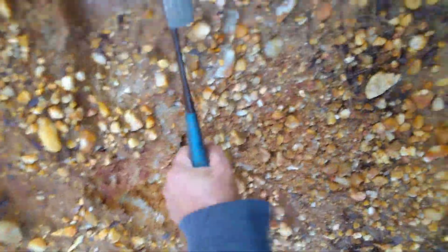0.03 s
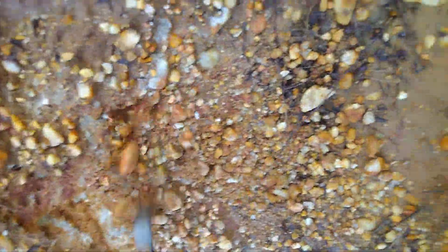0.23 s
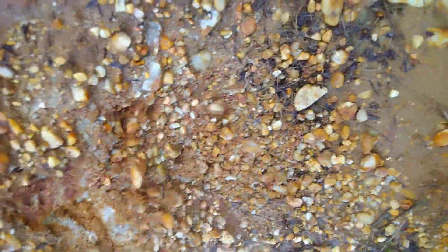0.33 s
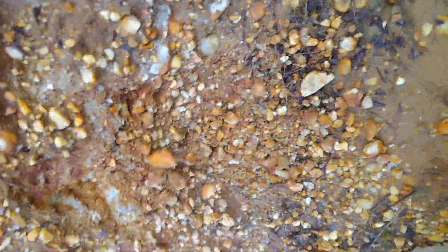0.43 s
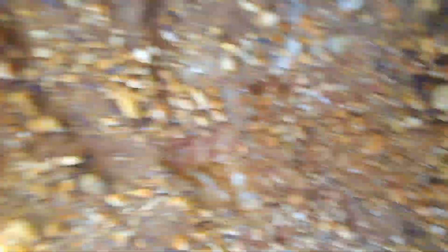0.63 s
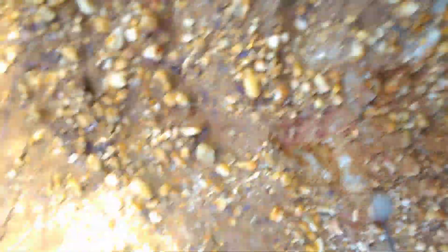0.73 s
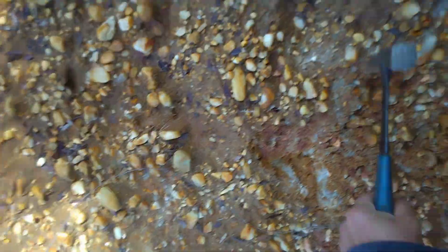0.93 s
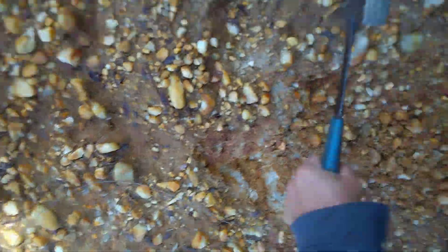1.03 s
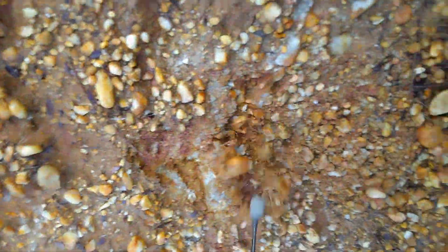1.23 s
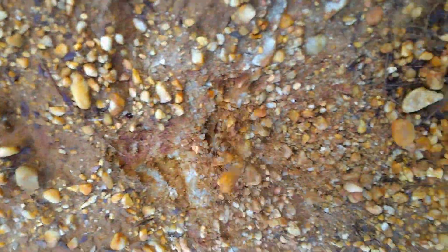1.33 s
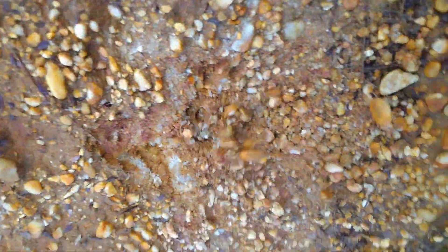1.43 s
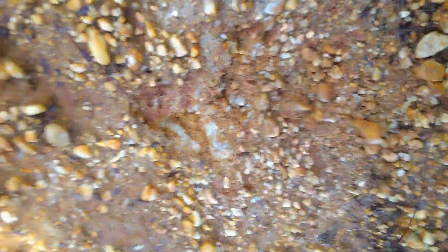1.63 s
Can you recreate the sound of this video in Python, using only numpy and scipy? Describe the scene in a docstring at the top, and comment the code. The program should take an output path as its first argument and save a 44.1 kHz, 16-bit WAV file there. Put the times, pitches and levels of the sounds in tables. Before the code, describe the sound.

A small pick strikes pebbly clay, crunching sharply with a faint dull thud; pebbles click down and sand trickles, then a second bite about a second later. Outdoors, very close stereo microphone, almost no background.

```python
"""Faint open-air noise lies under everything. A rock pick bites into pebbly clay, close below a small
two-port microphone: bursts of grains make gritty crunches with a dull thud, and stones ring when knocked.
Then loosened pebbles click down the face as short rings, and a flickering trickle of sand follows.
About a second after the first bite comes a second one, with more crunches, clicks and sand."""
import sys
import numpy as np
from scipy import signal
from scipy.fft import rfft, irfft
from scipy.io import wavfile
from scipy.ndimage import uniform_filter1d, map_coordinates

SR = 44100
rng = np.random.default_rng(int(sys.argv[2]) if len(sys.argv) > 2 else 0)


def store_wav(level_fs):
    """Save 16-bit WAV to argv[1]."""
    pcm = np.round(np.clip(np.atleast_2d(level_fs), -1, 1) * 32767)
    wavfile.write(sys.argv[1], SR, pcm.T.astype(np.int16))


N = 74970

# Open air, its colour: pitch_hz, relative level_db (per Hz)
AIR_COLOUR = [(25, -8), (70, 10.5), (200, -9), (500, -7.5), (1000, -19), (3000, -22), (9000, -40.5),
              (13000, -13.5), (16000, -53)]
# Open air, its level over time: time_s, level_db (of the part shared by left and right)
AIR_LEVEL = [(0.15, -71), (0.8, -65), (1.0, -71.5), (1.45, -66)]
AIR_SWELL_DB, AIR_SWELLS_PER_S = 1.5, 15

# The four layers of the digging, as resonances: pitch_hz, width_hz, level_db
EARTH = [(180, 180, -6.5), (420, 540, -10.5)]  # packed clay
STONE = [(634, 450, -1), (963, 454, -0.5), (1800, 1930, 0)]  # stones knocking
SCRAPE = [(2740, 2200, -8), (4970, 6140, -7)]  # scraping edges
GRIT = [(7890, 3630, 1), (9950, 2900, 3), (14700, 4000, -9.5)]  # fine grit

# Trickling sand: time_s, treble level_db, middle level_db (both before each band's own level)
SAND_LEVELS = [(0.0, -70.5, -62.5), (0.226, -76, -73.5), (0.276, -40.5, -40), (0.354, -46.5, -53.5),
               (0.396, -62, -63), (0.458, -56.5, -53), (0.53, -49.5, -60), (0.59, -45.5, -63),
               (0.8, -57, -70.5), (0.89, -53, -67), (1.04, -71.5, -81.5), (1.188, -69.5, -57.5),
               (1.279, -74, -40), (1.396, -77, -52.5), (1.438, -50, -56), (1.7, -44.5, -45.5)]
SAND_GRAIN_DB, SAND_LIKENESS, SAND_GAIN = 4, 0.046, 1.44
SAND_FLICKER_DB, BAND_FLICKER_DB = 3.5, 4.5  # flicker of all the sand, of each band alone
TICKS_PER_S, TICK_DB, TICK_T60_S = 80, 3.5, .008  # stray grains over the trickle, in each band

# Pebbles clicking: start_s, level_db (before the trim below), pitch_hz, dull part_db (before doubling),
# left-right_db, left port late_ms, ring width_hz
CLICKS = [(0.1675, -15.5, 9800, -45, 15, 0.35, 353), (0.3308, 13.5, 8400, -52, -11, 0.1, 1490),
          (0.3594, -8, 7000, -11, 1, 0.11, 1500), (0.48, -13, 3080, -15.5, 4, 0.048, 1500),
          (0.4846, -6.5, 8600, -21, -10, -0.56, 1500), (0.49, -12, 8360, -15, 7, 0.22, 1500),
          (0.52, -5.5, 9930, -17, 18, 0.45, 1476), (0.5594, -9.5, 10000, -21, 3, -0.26, 1500),
          (0.6419, -9, 7700, -36, 2, -0.1, 600), (0.659, 0, 8660, -33, 2, -0.26, 1500),
          (0.6792, -13.5, 2500, -5, 6, -0.13, 1520), (0.6931, -8, 8800, -16, 21, 0.59, 600),
          (0.7076, -20, 10379, -29, -1, 0.2, 1500), (0.8477, 1, 8970, -34, 3, -0.18, 1480),
          (0.8699, -12.5, 9950, -25, -21, 0.204, 350), (0.9355, -17, 10700, -39, 12, 0.204, 1500),
          (0.9637, -13.5, 11170, -43, 11, 0.272, 350), (1.0884, -28.5, 12273, -17, 16, -0.085, 1460),
          (1.3345, -5.5, 9700, -13, 1, 0.0024, 1500), (1.3414, -16, 2550, -14, -11, 0.00016, 1500),
          (1.3689, 4.5, 10100, -8, -6, -0.045, 1500), (1.4075, -13, 11100, -15, 13, 0.3, 1510),
          (1.4616, -6, 10000, -35, -28, 0.13, 1500), (1.499, -13, 9400, -20, 8, -0.24, 1500),
          (1.5707, -1.5, 11000, -26, -1, -0.13, 1500), (1.652, -3.5, 9400, -19, -10, 0.065, 1500),
          (1.6781, -6, 8240, -6.5, -6, 0.062, 1500)]
CLICK_TRIM_DB = -7
# Dull part of a click: pitch_hz, width_hz, level_db
DULL_TAP = [(2370, 5900, 3.6), (4770, 6400, 9)]

# Larger stones knocked by the pick: start_s, peak level_db (before left-right), pitch_hz, ring width_hz
KNOCKS = [(0.2311, -31.5, 846, 350), (0.3302, -23, 890, 442), (0.329, -27, 205, 110),
          (0.332, -34, 453, 151), (0.3837, -31.5, 910, 393), (0.3848, -24, 294, 197),
          (1.2304, -17.5, 850, 447), (1.2363, -19.5, 840, 450), (1.27, -31, 256, 120),
          (1.2959, -30, 1970, 220), (1.3078, -19, 1706, 443), (1.309, -28, 259, 120),
          (1.3403, -18, 893, 500), (1.3688, -20, 1180, 610), (1.633, -33.5, 973, 300)]
KNOCK_LEFT_RIGHT_DB = 3

# Crunches of pick, clods and loose grit: start_s, level_db (before a 9 dB cut),
# thud_db, knock_db, scrape_db (relative, before the trims below),
# thud pitch_hz, knock pitch_hz, scrape pitch_hz, grit pitch_hz, left-right_db,
# rise_s, hold_s, fade_s (a 60 dB fade, before the layer's own speed)
CRUNCHES = [(0.166, -23.5, -64, -27.5, -30, 522, 570, 3470, 9670, 1, 0.00041, 0.00057, 0.021),
            (0.23, -1.5, -35.5, -27, -21.5, 366, 1386, 5560, 7590, 3, 0.0042, 0.0042, 0.013),
            (0.234, 4.5, -38, -33, -21.5, 236, 800, 5180, 8630, -2, 0.0026, 0.00067, 0.039),
            (0.266, -28, -29, -19, -7, 248, 1080, 6000, 9450, -5, 0.0012, 0.0018, 0.058),
            (0.328, -3, -33, -24, -14, 197, 830, 4730, 8360, 1.5, 0.0014, 0.0022, 0.017),
            (0.336, -19.5, -24, -21, -22, 443, 1500, 5400, 9100, -14, 0.0012, 0.0013, 0.021),
            (0.381, -1.5, -36.5, -17.5, -15, 237, 2255, 4650, 9740, 1.5, 0.00072, 0.00065, 0.031),
            (0.385, -5.5, -29, -51, -16.5, 320, 2050, 5790, 8520, -4, 0.00043, 0.0019, 0.03),
            (0.433, -28.5, -28, -12, -12, 236, 890, 5840, 8200, 3, 0.003, 0.0029, 0.017),
            (0.4795, -27, -23, -20, -6, 262, 2240, 3090, 8760, 1, 0.0018, 0.0027, 0.028),
            (0.486, -22, -34, -17, -26, 264, 2130, 4640, 8300, 3.5, 0.0011, 0.0025, 0.01),
            (0.518, -16.5, -39, -31.5, -15, 206, 2210, 6020, 9580, -1, 0.0047, 0.0019, 0.013),
            (0.5585, -26, -58, -50, -18, 183, 2130, 5600, 9150, -3.5, 0.00082, 0.0019, 0.036),
            (0.595, -24, -37.5, -27, -14.5, 272, 1700, 6000, 8300, 7, 0.0026, 0.0043, 0.16),
            (0.6, -15.5, -47, -21, -13, 194, 2270, 5890, 6820, 2, 0.0015, 0.0029, 0.021),
            (0.604, -22, -54, -23, -15.5, 266, 1020, 4640, 9150, -13.5, 0.0011, 0.0015, 0.04),
            (0.656, -21, -52, -29, -18, 228, 1830, 6100, 7460, 0, 0.0015, 0.0012, 0.14),
            (0.676, -23.5, -32, -14.5, -16, 214, 1480, 2264, 8500, 3.5, 0.00053, 0.0014, 0.04),
            (0.686, -25.5, -30.5, -26, -15.5, 257, 2470, 2534, 8860, -6, 0.0011, 0.0016, 0.088),
            (0.716, -31.5, -33.5, -22, -18, 250, 1510, 3140, 11360, 2.5, 0.0017, 0.0069, 0.13),
            (0.799, -36.5, -24, -36, -21, 184, 713, 5710, 10800, 10, 0.0012, 0.0018, 0.015),
            (0.816, -35.5, -33, -21, -10.5, 268, 1020, 6100, 7640, 7.5, 0.0022, 0.001, 0.1),
            (0.844, -10, -45.5, -33, -22.5, 220, 1490, 3030, 9930, 3.5, 0.0017, 0.0019, 0.025),
            (0.865, -31.5, -41, -31, -17, 237, 2220, 5700, 9900, 3, 0.0018, 0.0018, 0.092),
            (0.932, -26.5, -71, -62, -27, 158, 694, 6200, 10450, 2, 0.0019, 0.0018, 0.067),
            (0.984, -42, -28, -10, -23, 500, 1590, 2840, 11000, 10, 0.0015, 0.0022, 0.041),
            (1.026, -34, -32, -38, -24.5, 270, 1770, 5750, 6080, 2.5, 0.0029, 0.0021, 0.025),
            (1.086, -45, -52, -17, -10, 277, 980, 5900, 7380, -3, 0.0013, 0.00088, 0.035),
            (1.099, -40, -30, -14.5, -9, 192, 1700, 4400, 7690, 9.5, 0.0013, 0.0054, 0.015),
            (1.23, 3, -37.5, -23, -20.5, 514, 2300, 4900, 10170, -3, 0.0015, 0.0027, 0.014),
            (1.234, -12, -28, -31, -27, 155, 1375, 4110, 7920, 3, 0.0015, 0.0064, 0.041),
            (1.263, -3, -32, -19.5, -16, 250, 1780, 5480, 8960, 1.5, 0.0007, 0.00099, 0.059),
            (1.293, -21, -22, -10, -10.5, 207, 2130, 2880, 8800, 8, 0.001, 0.0047, 0.014),
            (1.306, -7, -24.5, -21, -9.5, 260, 1600, 4753, 9200, 0, 0.0038, 0.0032, 0.029),
            (1.331, -18, -30, -30, -17, 248, 2280, 2480, 9140, -11, 0.00074, 0.0039, 0.17),
            (1.34, -5.5, -20.5, -18.5, -11.5, 214, 870, 2694, 8420, 1.5, 0.0024, 0.00062, 0.028),
            (1.346, -14.5, -29, -27, -20.5, 310, 2260, 3330, 9240, -2, 0.0013, 0.0034, 0.064),
            (1.367, -2.5, -25.5, -27, -24, 243, 1165, 3206, 10750, 1, 0.0024, 0.0021, 0.038),
            (1.404, -27.5, -29, -42, -23, 420, 1300, 5390, 10800, -11, 0.00098, 0.0021, 0.066),
            (1.418, -25.5, -44, -21.5, -22, 335, 2330, 3740, 9500, 0.5, 0.0022, 0.0022, 0.065),
            (1.458, -20.5, -34.5, -48, -26, 193, 2100, 5500, 9100, -1, 0.00053, 0.001, 0.012),
            (1.481, -27.5, -21.5, -11.5, -26, 276, 2380, 2250, 8500, 6.5, 0.00066, 0.0019, 0.03),
            (1.4976, -14, -43, -52, -24.5, 290, 2350, 6100, 9200, -6, 0.001, 0.001, 0.021),
            (1.521, -40.5, -20, -6, -12, 284, 2260, 4060, 7350, 4, 0.0015, 0.0036, 0.057),
            (1.567, -20, -38.5, -68, -25.5, 430, 2300, 5280, 9340, -2.5, 0.0013, 0.0037, 0.079),
            (1.59, -25, -35.5, -36, -21, 276, 2070, 5650, 8940, -2, 0.0015, 0.0022, 0.12),
            (1.609, -23.5, -34, -16.5, -13.5, 236, 2080, 4260, 8260, 0.5, 0.003, 0.0013, 0.095),
            (1.632, -26, -17, -5.5, -17, 270, 977, 2450, 9600, 4.5, 0.00073, 0.0053, 0.015),
            (1.6495, -16, -42, -51, -18.5, 401, 2170, 6090, 8760, -2, 0.00072, 0.0011, 0.023),
            (1.676, -28, -19.5, -6.5, -6, 270, 2050, 2880, 8350, 3, 0.0055, 0.0012, 0.027),
            (1.68, -26.5, -35, -16, -11, 513, 1500, 3030, 8900, 1, 0.0011, 0.001, 0.025)]
THUD_TRIM_DB, KNOCK_TRIM_DB, SCRAPE_TRIM_DB, GRIT_LEVEL_DB = 6.5, 2, 5.5, -5
# Each crunch's own pitch, one row a layer (thud, knock, scrape, grit): width_hz, level_db
OWN_PITCH = [(130, 7.5), (260, 10.5), (500, 2), (900, 5)]
# One value a layer, in the same order:
LAYER_LIKENESS = (0.99, 0.32, 0.33, 0.059)  # left-right likeness, 0 to 1
PUSH_DB = (1, -5, -18, -31)  # level_db of the first contact, a single push
FADE_SPEED = (0.76, 0.85, 1.093, 1.076)  # power on the burst's shape: above 1 dies away faster
GRAIN_DB, TAIL_DB, TAIL_T60_S = 4, -19.5, 0.15  # the tail's fade is also before the layer's own speed
LUMPS_PER_S, LUMP_DB = 1100, 3.5  # a crunch breaks up into uneven cracks
# Small stones ring briefly at chance pitches; the width is for a 2000 Hz layer pitch
RINGS, RING_WIDTH_HZ, RING_DB, RING_ABOVE_HZ = 5, 100, 1, 1200
# The digging moves from the right to the middle: time_s, left port delay_s
LEFT_LATE = [(.7, .00011), (1.2, 0)]

FULL_SCALE, ROLL_HZ, TOP_HZ = .72, 14800, 16650  # microphone: amplitude limit, roll-off, steep cut


def undb(db):
    """Turn decibels into an amplitude factor."""
    return 10 ** (np.asarray(db) / 20)


def unit(x):
    """Scale to an average (RMS) strength of 1."""
    return x / np.sqrt(np.mean(x ** 2))


def left_right(value):
    """Give the left port a value and the right port its opposite."""
    return np.array([[value], [-value]])


def ring(x, hz, width_hz):
    """Resonance with gain 1 at its centre; a narrower one rings longer."""
    return signal.lfilter(*signal.iirpeak(min(hz, SR * .45), hz / width_hz, SR), x)


def body(x, table):
    """Sum of resonances with alternating signs, each applied twice for steep skirts."""
    total = 0
    for k, (hz, width_hz, db) in enumerate(table):
        twice = ring(ring(x, hz, width_hz), hz, width_hz)
        total = total + (-1) ** k * undb(db) * twice
    return total


def grains(n, spread_db, likeness):
    """Dense clicks of uneven size, partly shared by both ports."""
    size = undb(spread_db * np.minimum(rng.exponential(size=n), 4))
    shared = np.clip(likeness, 0, 1)
    both, own = rng.standard_normal(n), rng.standard_normal((2, n))
    return unit(size * (np.sqrt(shared) * both + np.sqrt(1 - shared) * own))


def walk(rate, n=N):
    """Random levels, about `rate` a second, gliding from one to the next."""
    step = int(SR / rate)
    levels = np.repeat(rng.standard_normal(n // step + 1), step)
    return uniform_filter1d(levels, step)[:n]


def air():
    """Faint open-air noise, swelling a little; the bass is more alike left and right."""
    hz, table = np.arange(N // 2 + 1) * SR / N + 1, np.array(AIR_COLOUR)
    colour = undb(np.interp(np.log(hz), np.log(table[:, 0]), table[:, 1]))
    mid = irfft(rfft(rng.standard_normal(N)) * colour, N)
    side_colour = colour * np.clip(hz / 770.0, .75, 1)
    side = irfft(rfft(rng.standard_normal(N)) * side_colour, N)
    level_db = np.interp(np.arange(N) / SR, *np.transpose(AIR_LEVEL))
    level_db = level_db + AIR_SWELL_DB * walk(AIR_SWELLS_PER_S)
    return undb(level_db) * (mid + side * left_right(1)) / np.std(mid)


def sand():
    """Fine grains run down after each bite; every band of grain flickers and ticks on its own."""
    t, levels = np.arange(N) / SR, np.array(SAND_LEVELS)
    out, shared_flicker_db = 0, SAND_FLICKER_DB * walk(20.43)
    tick_decay = 1000 ** (-1 / (TICK_T60_S * SR))
    for column, table in ((1, GRIT), (2, STONE[2:] + SCRAPE)):
        for hz, width_hz, band_db in table:
            ticks = rng.random(N) < TICKS_PER_S / SR
            ticks = ticks * np.minimum(rng.exponential(size=N), 2) * undb(TICK_DB)
            flow = undb(shared_flicker_db + BAND_FLICKER_DB * walk(60))
            flow = flow + signal.lfilter([1], [1, -tick_decay], ticks)
            level_db = band_db + np.interp(t, levels[:, 0], levels[:, column])
            band = body(grains(N, SAND_GRAIN_DB, SAND_LIKENESS), [(hz, width_hz, 0)])
            out = out + flow * undb(level_db) * SAND_GAIN * band
    return out


def clicks():
    """One sharp contact rings a pebble for a few cycles, over a duller tap."""
    n = SR // 40
    out = np.zeros((2, N + n))
    for start_s, peak_db, hz, dull_db, pan_db, late_ms, width_hz in CLICKS:
        # a single impulse, shifted by half of late_ms at each port, later at the left and earlier at the right
        touch = np.sinc(np.arange(n) - 40 - left_right(late_ms) * SR / 2000)
        bell = ring(touch, hz, max(width_hz, 50))
        tap = body(touch, DULL_TAP)
        click = bell / np.abs(bell).max() + undb(dull_db) * tap / np.abs(tap).max() * 2
        # the nearer side keeps its level, the other is turned down
        port_db = (left_right(pan_db) - abs(pan_db)) / 2
        i = int(start_s * SR) - 44
        out[:, i:i + n] += click * undb(peak_db + CLICK_TRIM_DB + port_db)
    return out[:, :N]


def knocks():
    """One blunt contact rings a stone for a few cycles."""
    n = SR // 20
    out = np.zeros(N + n)
    for start_s, peak_db, hz, width_hz in KNOCKS:
        contact = 1. * (np.arange(n) == 0)
        stone = body(contact, [(hz, max(width_hz, 50), 0)])
        i = int(start_s * SR)
        out[i:i + n] += stone / np.abs(stone).max() * undb(peak_db)
    return out[:N] * undb(left_right(KNOCK_LEFT_RIGHT_DB) / 2)


def crunch_shape(t, rise_s, hold_s, fade_s):
    """Loudness of one breaking clod: rise, hold, fast fade and crumbling tail, in uneven lumps."""
    after = np.maximum(t - .001 - abs(hold_s), 0) * np.log(1000)
    rise = np.exp(np.minimum(t - .001, 0) / max(rise_s, .0002) * 2)
    fade = np.exp(-after / max(fade_s, .004))
    tail = undb(TAIL_DB) * np.exp(-after / TAIL_T60_S)
    lumps = undb(LUMP_DB * np.clip(walk(LUMPS_PER_S, len(t)), -2, 1.5))
    return rise * (fade + tail) * lumps


def small_stones(hz):
    """Resonances at chance pitches around a layer's pitch; 40 dB weaker for a low layer."""
    width_hz = RING_WIDTH_HZ * (hz / 2000) ** .5
    level_db = RING_DB - 40 * (hz < RING_ABOVE_HZ)
    return [(hz * 2 ** octaves, width_hz, level_db) for octaves in rng.uniform(-0.588, 0.523, RINGS)]


def crunches():
    """Each crunch drives earth, stone, scrape and grit resonances with a burst of grains and one push."""
    n, lead = SR // 5, SR // 100  # the rise starts ahead of the contact
    t = (np.arange(n) - lead) / SR
    push = 1. * (np.arange(n) == lead + SR // 1000)
    out = np.zeros((2, N + n))
    for (start_s, peak_db, thud_db, knock_db, scrape_db, *pitch_hz,
         pan_db, rise_s, hold_s, fade_s) in CRUNCHES:
        env = crunch_shape(t, rise_s, hold_s, fade_s)
        layer_db = (thud_db + THUD_TRIM_DB, knock_db + KNOCK_TRIM_DB,
                    scrape_db + SCRAPE_TRIM_DB, GRIT_LEVEL_DB)
        burst = 0
        for table, hz, (width_hz, own_db), db, likeness, push_db, speed in zip(
                (EARTH, STONE, SCRAPE, GRIT), pitch_hz, OWN_PITCH, layer_db,
                LAYER_LIKENESS, PUSH_DB, FADE_SPEED):
            shape = env ** speed
            resonances = table + [(hz, width_hz, own_db)] + small_stones(hz)
            contact = undb(push_db) * np.sqrt(np.sum(shape ** 2)) * push
            layer = body(shape * grains(n, GRAIN_DB, likeness) + contact, resonances)
            burst = burst + undb(db) * unit(layer) * np.sqrt(np.mean(env ** 2))
        i = int(start_s * SR) - lead
        out[:, i:i + n] += burst * undb(peak_db - 9 + left_right(pan_db) / 2)
    late_s = np.interp(np.arange(N) / SR, *np.transpose(LEFT_LATE))
    left = map_coordinates(out[0], [np.arange(N) - late_s * SR])
    return np.array([left, out[1, :N]])


def scene():
    """Add all the sources together."""
    return crunches() + knocks() + clicks() + sand() + air()


def record(dry):
    """The microphone rounds the loudest peaks, rolls off, then cuts the top steeply."""
    rounded = FULL_SCALE * np.tanh(dry / FULL_SCALE)
    rolled = signal.sosfilt(signal.butter(8, ROLL_HZ, fs=SR, output="sos"), rounded)
    return signal.sosfilt(signal.ellip(12, .2, 90, TOP_HZ, fs=SR, output="sos"), rolled)


dry = scene()
out = record(dry)
store_wav(out)
```